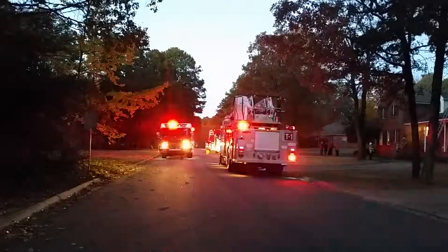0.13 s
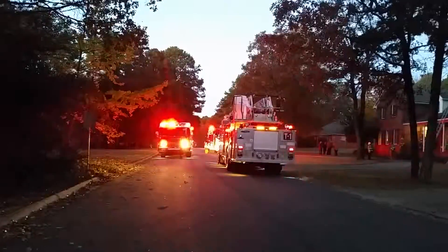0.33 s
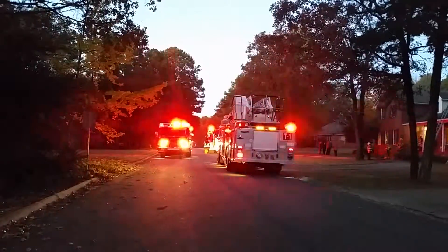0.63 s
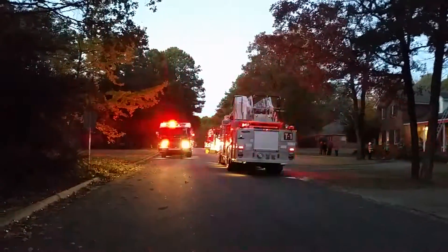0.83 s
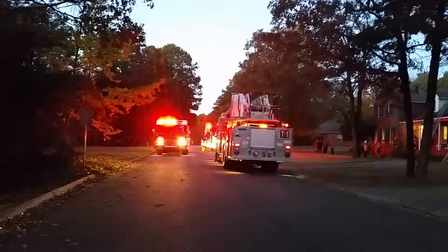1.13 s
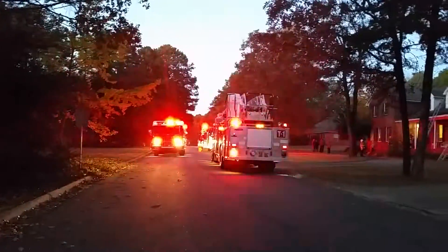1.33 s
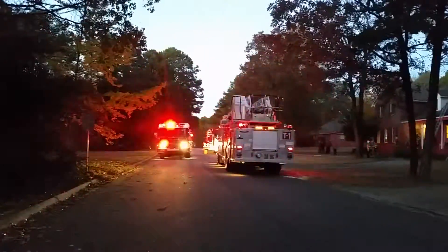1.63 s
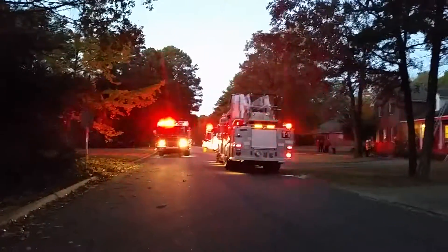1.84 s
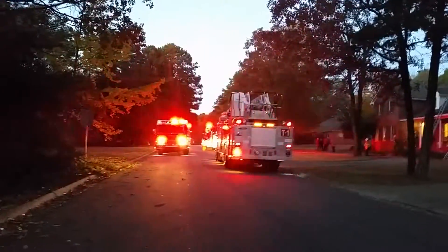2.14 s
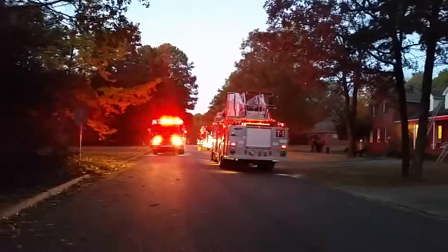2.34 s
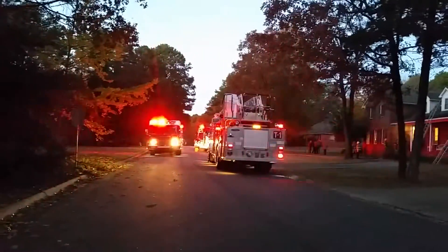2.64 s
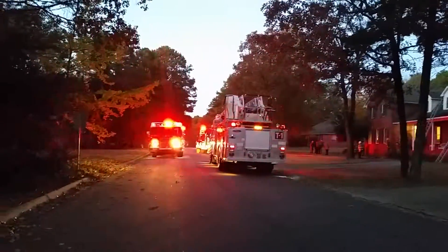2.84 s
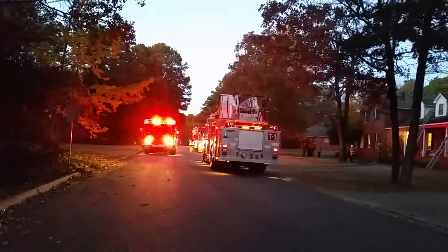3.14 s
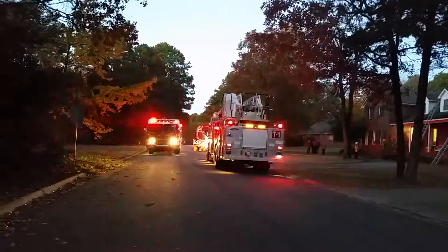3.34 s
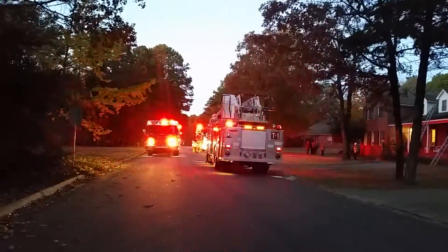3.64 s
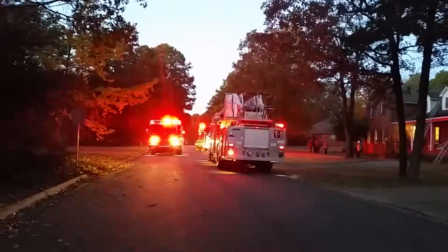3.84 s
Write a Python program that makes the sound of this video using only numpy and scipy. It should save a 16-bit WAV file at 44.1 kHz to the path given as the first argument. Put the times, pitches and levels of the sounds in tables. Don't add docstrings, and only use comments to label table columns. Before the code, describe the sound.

Heavy diesel fire trucks idle some way down a quiet street. Silence until about 0.4 s, then a quick fade-in, full by 0.7 s, holding steady to the end near 4 s. Low exhaust drones beat slowly against each other beneath rapid combustion knocking, thin gear and pump whines, fan hum and rush, and treble hiss. Stereo phone outdoors, mids leaning left, treble slightly chirpy; no sirens.

```python
import sys
import numpy as np
from scipy import signal
from scipy.fft import rfft, irfft
from scipy.io import wavfile

SR = 44100
rng = np.random.default_rng(int(sys.argv[2]) if len(sys.argv) > 2 else 0)


def voltage_ratio(level):
    return 10 ** (np.asarray(level, float) / 20)


def wrap_up_sound(samples):
    columns = np.atleast_2d(samples).T
    tamed = np.clip(columns, -1, 1)
    steps = np.round(tamed * 32767).astype(np.int16)
    wavfile.write(sys.argv[1], SR, steps)


N = 176400
NEAR_CYCLE_HZ, FAR_CYCLE_HZ = 5.8803, 5.845


def rms_one(x):
    return x / np.sqrt(np.mean(x ** 2) + 1e-20)


def at_hz(points, hz):
    p = np.array(points)
    return np.interp(np.log(np.maximum(hz, 1)), np.log(p[:, 0]), p[:, 1])


def drift(rate_hz):
    r = np.exp(-80 * np.pi * rate_hz / SR)
    slow = signal.lfilter([1], [1, -2 * r, r * r], rng.standard_normal(N // 40 + 2002))
    slow = rms_one(slow[2000:])
    return np.interp(np.arange(N) / 40, np.arange(len(slow)), slow)


def tones(base_hz, orders, levels_db):
    wander_hz, flutter_hz, wobble_rad, flutter_db = .5, 1.0, .3, 1.3
    turn = 2 * np.pi * base_hz * np.arange(N) / SR
    wander = drift(wander_hz)
    out = 0
    for order, db in zip(orders, levels_db):
        level = np.sqrt(2) * voltage_ratio(db + flutter_db * drift(flutter_hz))
        wobble = wobble_rad * (wander + drift(flutter_hz))
        out = out + level * np.sin(order * turn + wobble + rng.uniform(0, 2 * np.pi))
    return out


# multiple of the engine cycle; below it, level in dB.
NEAR_ORDERS = (3, 6, 12, 14, 15, 18, 20, 111, 122, 128, 134, 152, 168, 171, 179, 201)
NEAR_DB = [-62, -52, -39.5, -46, -48, -37, -45, -53, -45, -49, -52, -43, -51, -49, -50, -52]
# multiple of the engine cycle; below it, level in dB.
FAR_ORDERS = (4, 8, 17, 24, 28, 54)
FAR_DB = [-44, -60, -39.5, -66, -48, -51]


def exhausts_and_gears():
    return tones(NEAR_CYCLE_HZ, NEAR_ORDERS, NEAR_DB) + tones(FAR_CYCLE_HZ, FAR_ORDERS, FAR_DB)


# multiple of the pump speed; below it, level in dB.
PUMP_ORDERS = (2, 3, 4, 6, 56.03)
PUMP_DB = [-39, -48, -38, -49, -48.5]


def pump():
    return tones(24.47, PUMP_ORDERS, PUMP_DB)


# multiple of the blade rate; below it, level in dB.
FAN_ORDERS = (1, 2)
FAN_DB = [-37, -35.5]


def fan():
    return tones(115.6, FAN_ORDERS, FAN_DB)


# frequency in Hz, width in Hz, level in dB.
BLOCK = [(667, 90, -17.5), (728, 90, -10), (893, 70, -10), (998, 55, -6), (1102, 24, -12), (1474, 36, -7.5),
         (1990, 60, -9)]


def knocks(cycle_hz):
    jitter_s, cylinder_db, spread_db, soft_hz = .00015, 3.5, 2.0, 1490
    firing_hz = 6 * cycle_hz
    firing = np.arange(int(firing_hz * N / SR) - 1)
    when = (firing + .5) / firing_hz + jitter_s * rng.standard_normal(len(firing))
    at = (when * SR).astype(int)
    out = 0
    for k, (hz, width_hz, db) in enumerate(BLOCK):
        cylinder = cylinder_db * rng.standard_normal(6)[firing % 6]
        clicks = np.full(N, 1e-18)
        clicks[at] = voltage_ratio(db + cylinder + spread_db * rng.standard_normal(len(at)))
        r = np.exp(-np.pi * width_hz / SR)
        angle = 2 * np.pi * hz / SR
        ring = signal.lfilter([0, np.sin(angle)], [1, -2 * r * np.cos(angle), r * r], clicks)
        out = out + (-1) ** k * ring
    return rms_one(signal.sosfilt(signal.butter(2, soft_hz, fs=SR, output="sos"), out))


def struck_blocks():
    return voltage_ratio(-43.5) * (knocks(NEAR_CYCLE_HZ) + .9 * knocks(FAR_CYCLE_HZ))


def puffing(cycle_hz):
    depth, sharpness = .1, .8
    phase = 12 * np.pi * cycle_hz * np.arange(N) / SR - np.pi - .5
    beat = np.exp(sharpness * np.cos(phase))
    return rms_one(1 + depth * (beat / beat.mean() - 1))


def noise(spectrum, patchy_db):
    hz = np.fft.rfftfreq(N, 1 / SR)
    low, high = spectrum[0][0], spectrum[-1][0]
    ends = np.minimum(1, (hz / low) ** 3) * np.minimum(1, (high / np.maximum(hz, 1)) ** 4)
    coloured = rfft(rng.standard_normal((2, N))) * voltage_ratio(at_hz(spectrum, hz)) * ends
    out = 0
    for octave in range(4, 15):
        share = np.clip(1 - abs(np.log2(np.maximum(hz, 1)) - octave), 0, 1)
        if low / 3 < 2 ** octave < high * 3:
            out = out + irfft(coloured * share, N) * voltage_ratio(patchy_db * drift(4.5))
    return rms_one(out)


# frequency in Hz, level in dB per Hz.
CLATTER = [(450, -10.5), (560, -10), (730, -10.5), (1040, -5), (1200, -7), (1550, -8), (2150, -15),
           (2350, -18.5)]


def clatter():
    return voltage_ratio(-34) * noise(CLATTER, patchy_db=1.36)


# frequency in Hz, level in dB per Hz.
HISS = [(2200, 2), (3300, 4.5), (4250, 1), (4500, -0.5), (6000, -2), (8000, -6.5), (12400, -10.5),
        (14600, -12.5)]


def hiss():
    return voltage_ratio(-41.5) * noise(HISS, patchy_db=0.5)


def injectors():
    centre_hz, width_hz = 6320, 70
    edges_hz = [centre_hz - width_hz / 2, centre_hz + width_hz / 2]
    band = signal.butter(2, edges_hz, "band", fs=SR, output="sos")
    return voltage_ratio(-70) * rms_one(signal.sosfilt(band, rng.standard_normal((2, N))))


# frequency in Hz, level in dB per Hz.
RUSH = [(15, -44), (25, -17), (102, -8), (176, -9.5), (236, -13), (279, -11.5), (501, -16.5), (545, -20),
        (700, -15.5), (910, -19), (1540, -120)]


def rush():
    return voltage_ratio(-31.5) * noise(RUSH, patchy_db=-1.2)


# frequency in Hz, left-right likeness from 0 to 1.
LIKENESS = [(80, .995), (250, .99), (430, .95), (700, .84), (1300, .6), (2000, .5), (3000, .3), (8000, .1)]
# frequency in Hz, left minus right in dB.
LEAN = [(60, 1.5), (170, 2.7), (300, 5), (560, 7), (870, 4.5), (1500, 12.5), (1950, 9), (2400, 10)]
# frequency in Hz, left minus right in dB.
LEAN_HIGH = [(2400, 12), (3400, 2.7), (5000, -5.5), (6000, 1.5), (6900, 15.5), (8200, 15.5), (10000, 0),
             (12500, -3)]
# frequency in Hz, lag of the right port in radians.
PORT_PHASE = [(60, .3), (220, .6), (760, .4), (920, 1.0), (1600, 1.9), (1950, .1), (3400, -1.5),
              (5000, 2.9)]
# frequency in Hz, gain in dB.
PORT_DIP = [(7600, -0.5), (8200, -3), (8450, -8.5), (9100, -9.5), (9650, -4.5), (10100, -0.5), (12000, 4.5)]


def ports(direct, scattered):
    hz = np.fft.rfftfreq(N, 1 / SR)
    alike = np.clip(at_hz(LIKENESS, hz), 0, 1)
    lean_db = np.where(hz < LEAN[-1][0], at_hz(LEAN, hz), at_hz(LEAN_HIGH, hz))
    lean = voltage_ratio(lean_db / 2)
    left = rfft(direct)
    shifted = left * np.exp(-1j * at_hz(PORT_PHASE, hz))
    right = alike * shifted + np.sqrt(1 - alike ** 2) * rfft(scattered)
    level = np.sqrt(2 / (lean ** 2 + lean ** -2)) * voltage_ratio(at_hz(PORT_DIP, hz))
    return irfft(np.array([left * lean, right / lean]) * level, N)


def squelch(x):
    from_hz, threshold_db = 6800, -1
    hz, _, cells = signal.stft(x, SR, window="cosine", nperseg=2048)
    power = abs(cells) ** 2
    typical = np.mean(power[:, (hz > 10500) & (hz < 14000)])
    faint = (power < typical * voltage_ratio(2 * threshold_db)) & (hz[:, None] > from_hz)
    return signal.istft(np.where(faint, 0, cells), SR, window="cosine", nperseg=2048)[1][:, :N]


def scene():
    engines = exhausts_and_gears() + pump() + fan() + struck_blocks()
    gate = puffing(FAR_CYCLE_HZ)
    air = gate * clatter() + gate * hiss() + injectors() + rush()
    echo_s = .02
    return ports(engines + air[0], np.roll(engines, int(echo_s * SR)) + air[1])


def top_cut(x):
    return signal.sosfilt(signal.butter(12, 14520, fs=SR, output="sos"), x)


# time in seconds, gain in dB.
FADE = [
    (.416, -50),
    (.43, -25),
    (.456, -16),
    (.5, -11),
    (.6, -4.5),
    (.7, 0),
]


def record(dry):
    s, db = np.transpose(FADE)
    t = np.arange(N) / SR
    fade = np.interp(t, s, voltage_ratio(db)) * (t > s[0])
    return top_cut(squelch(dry) * fade)


dry = scene()
out = record(dry)
wrap_up_sound(out)
```